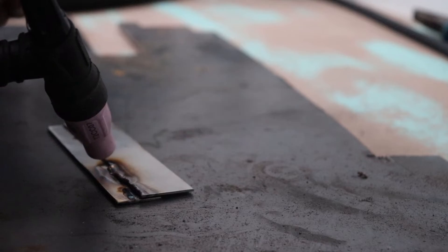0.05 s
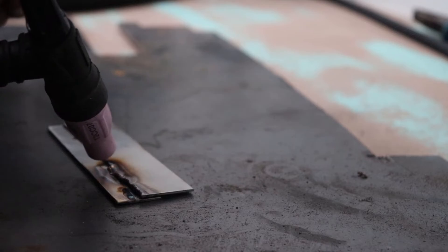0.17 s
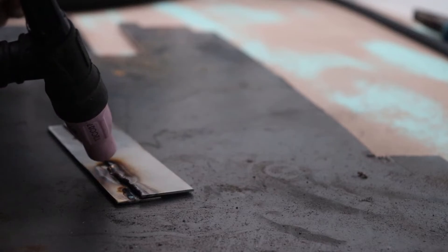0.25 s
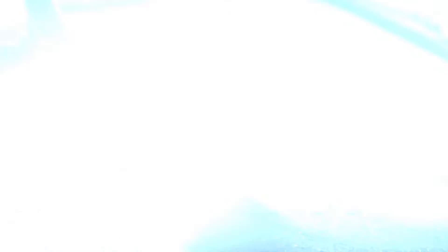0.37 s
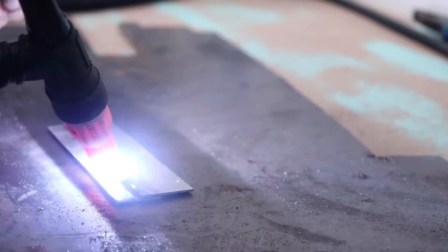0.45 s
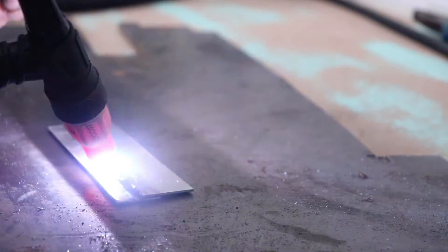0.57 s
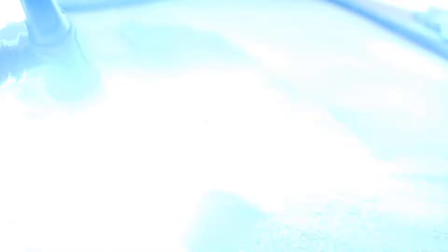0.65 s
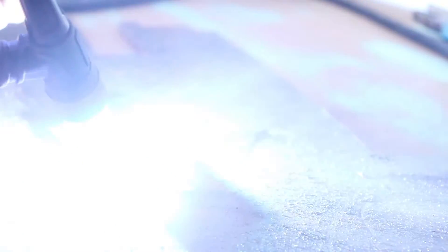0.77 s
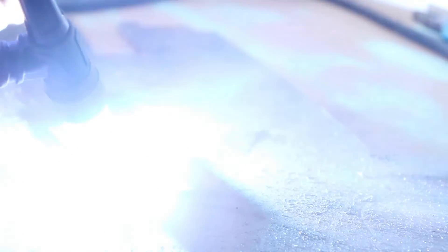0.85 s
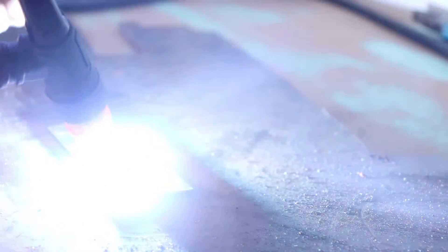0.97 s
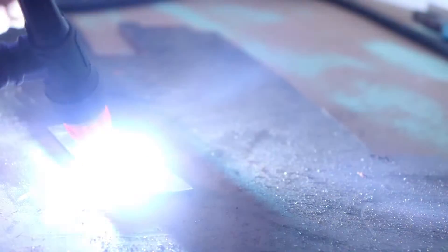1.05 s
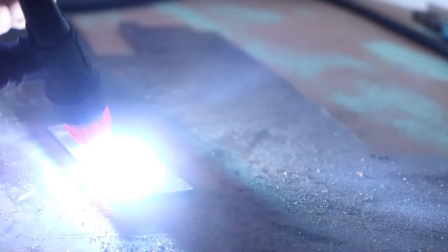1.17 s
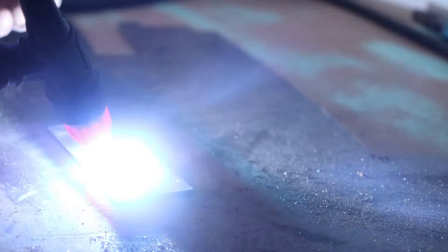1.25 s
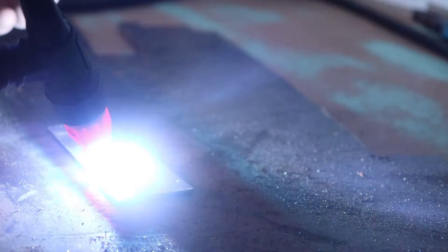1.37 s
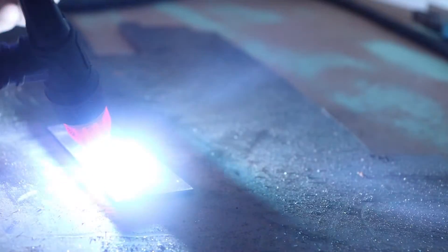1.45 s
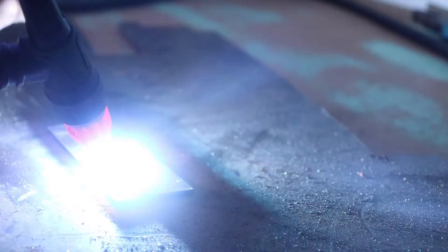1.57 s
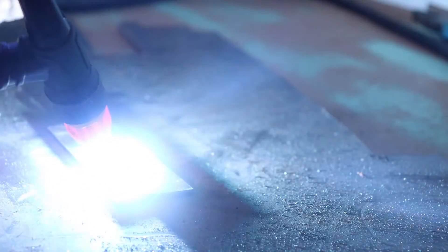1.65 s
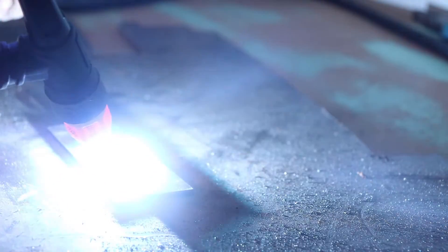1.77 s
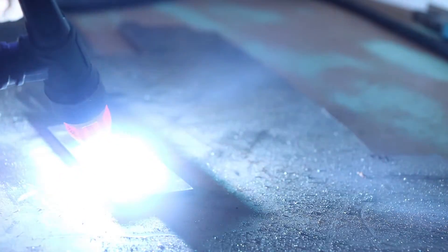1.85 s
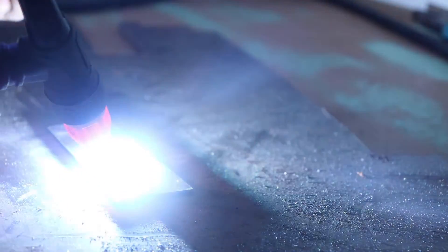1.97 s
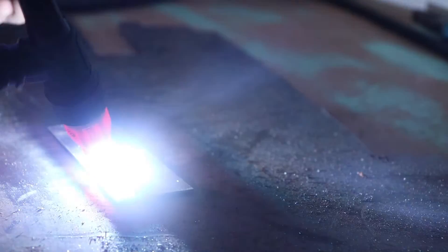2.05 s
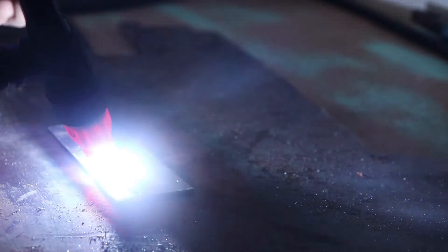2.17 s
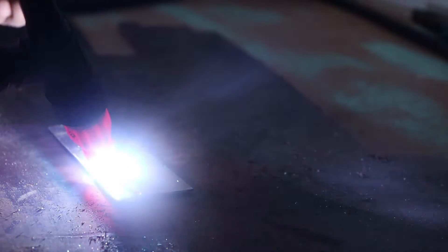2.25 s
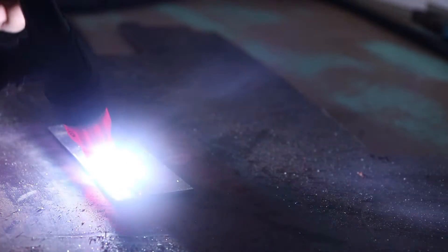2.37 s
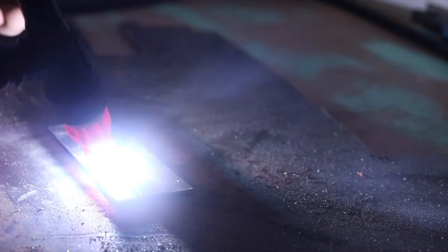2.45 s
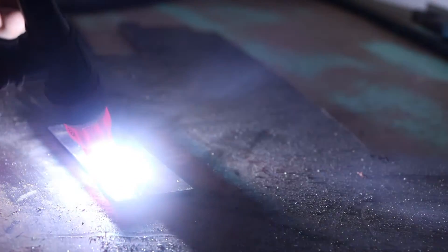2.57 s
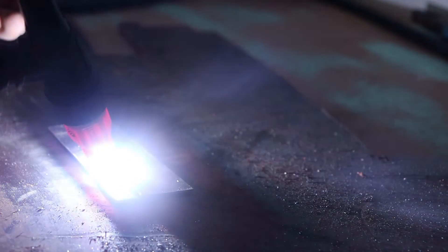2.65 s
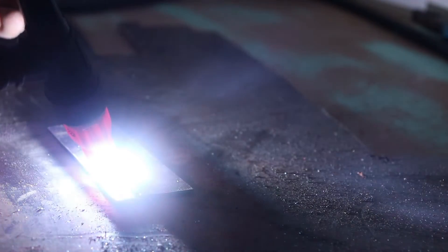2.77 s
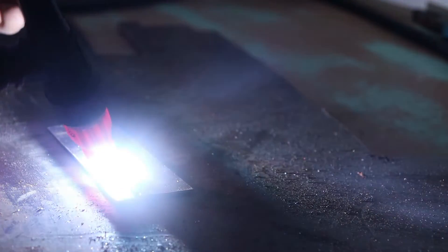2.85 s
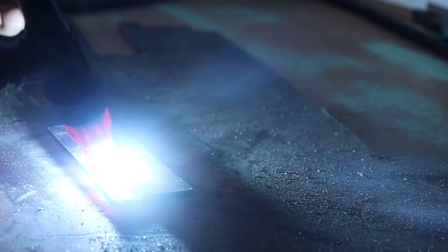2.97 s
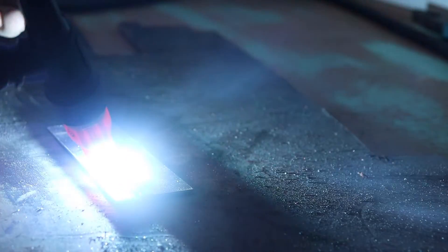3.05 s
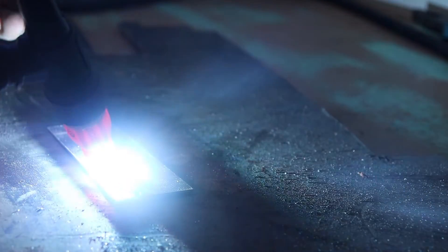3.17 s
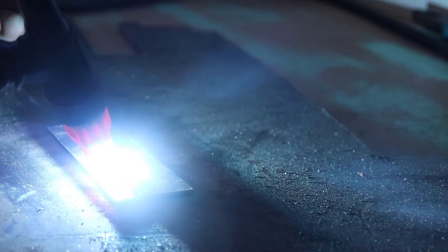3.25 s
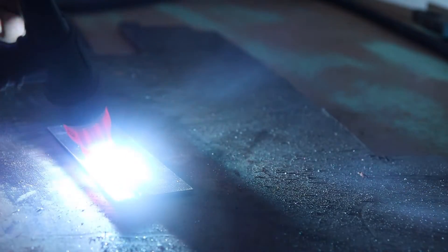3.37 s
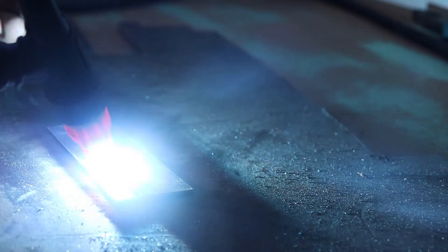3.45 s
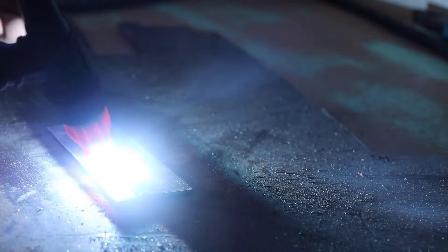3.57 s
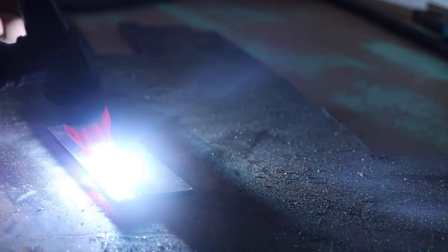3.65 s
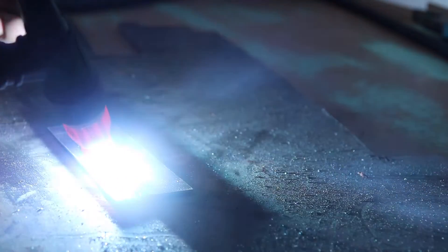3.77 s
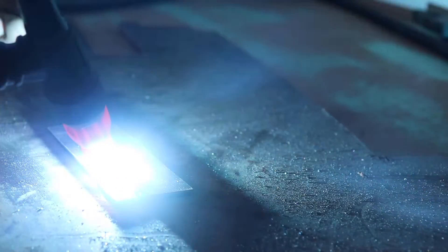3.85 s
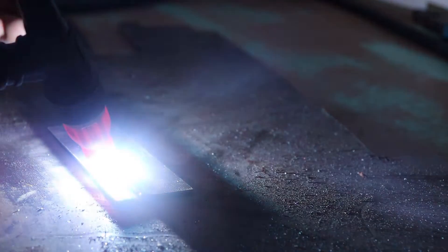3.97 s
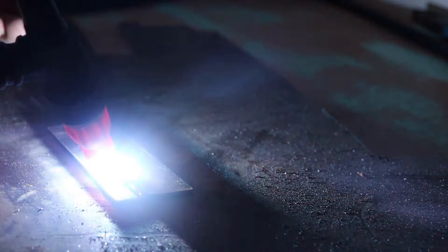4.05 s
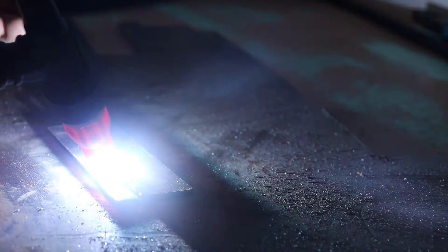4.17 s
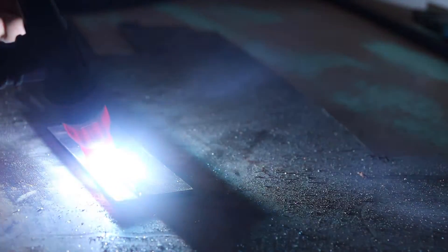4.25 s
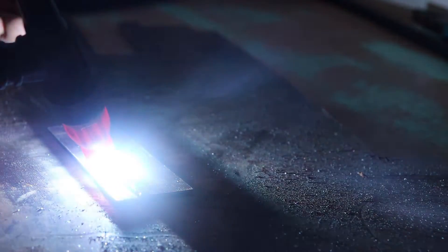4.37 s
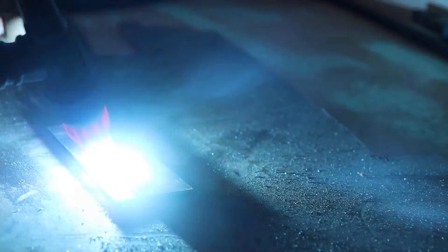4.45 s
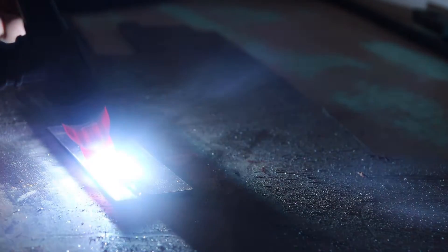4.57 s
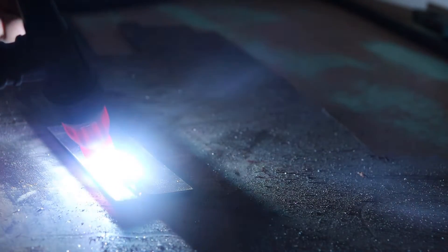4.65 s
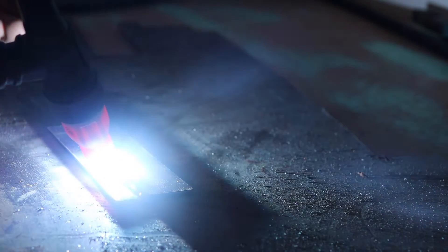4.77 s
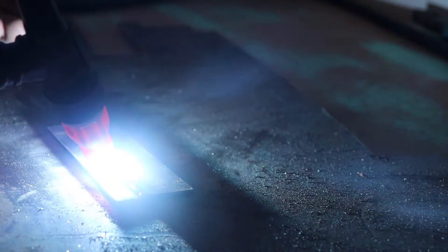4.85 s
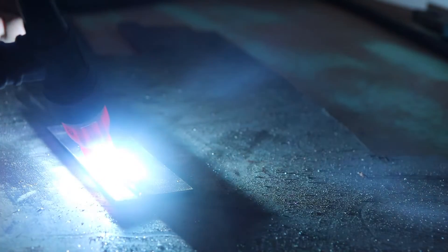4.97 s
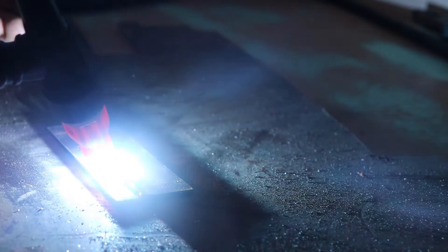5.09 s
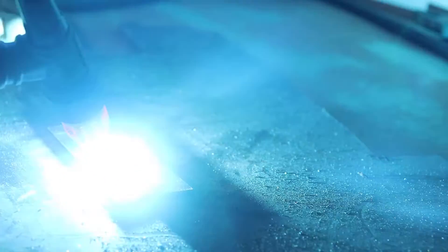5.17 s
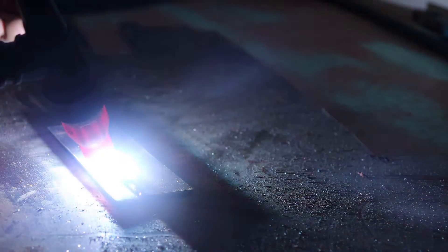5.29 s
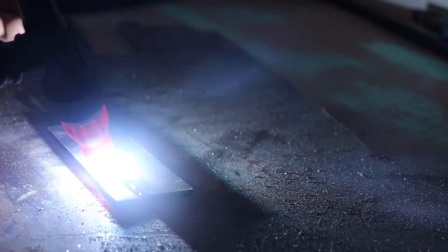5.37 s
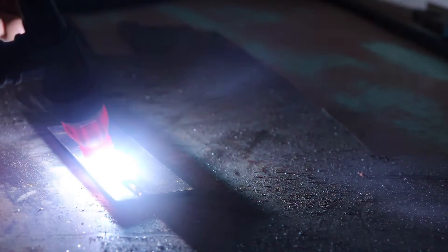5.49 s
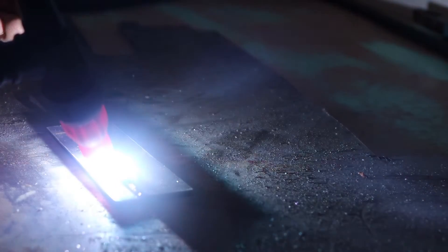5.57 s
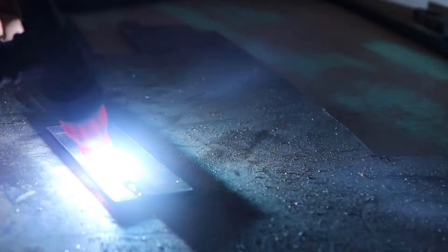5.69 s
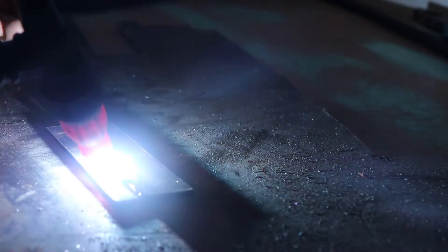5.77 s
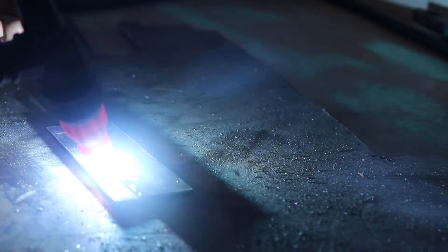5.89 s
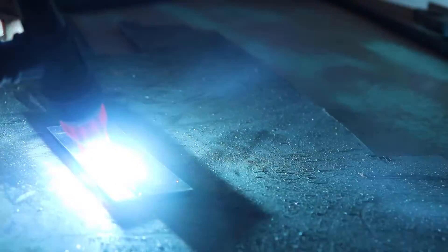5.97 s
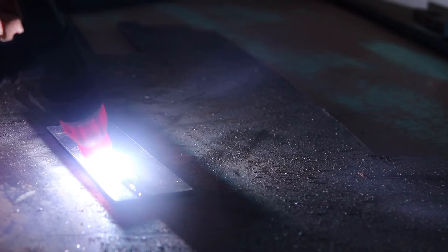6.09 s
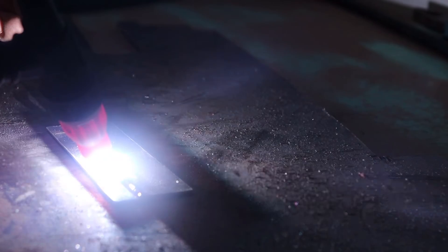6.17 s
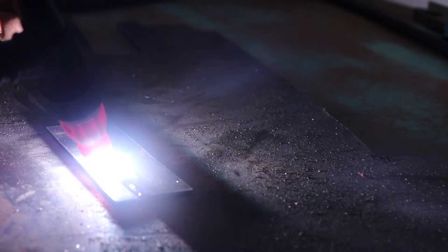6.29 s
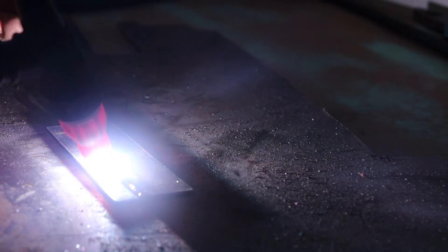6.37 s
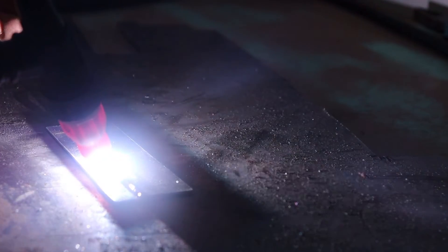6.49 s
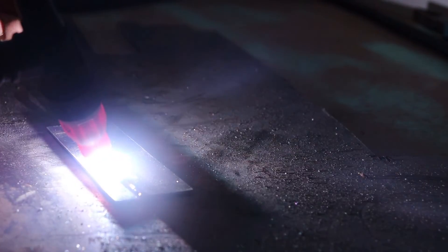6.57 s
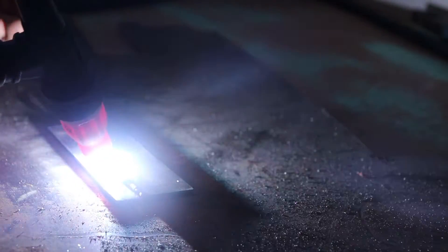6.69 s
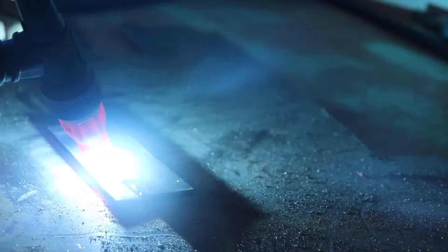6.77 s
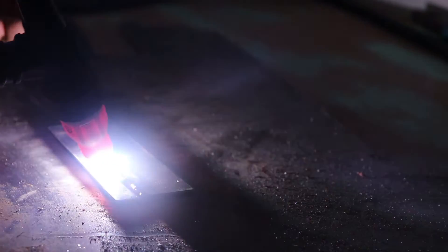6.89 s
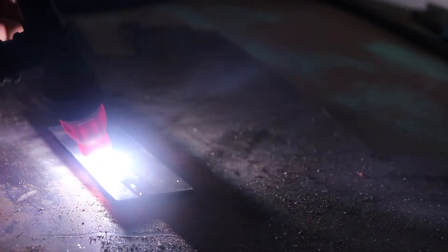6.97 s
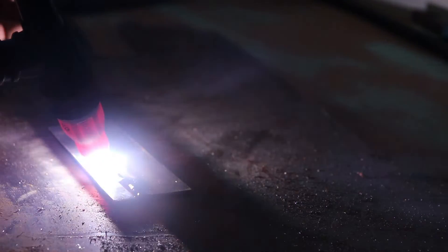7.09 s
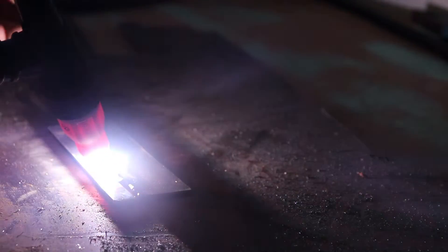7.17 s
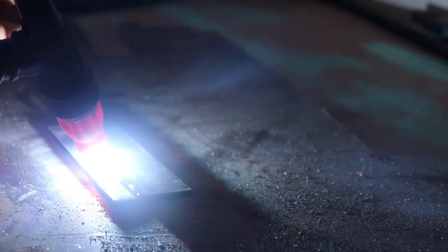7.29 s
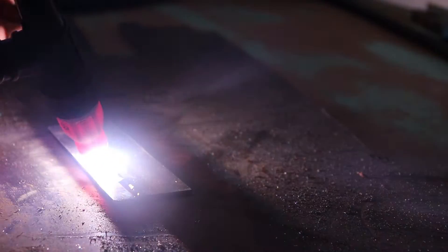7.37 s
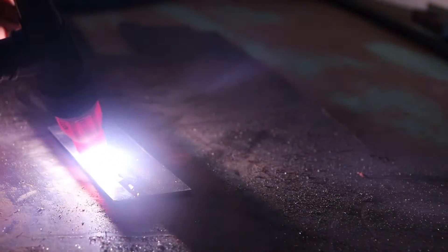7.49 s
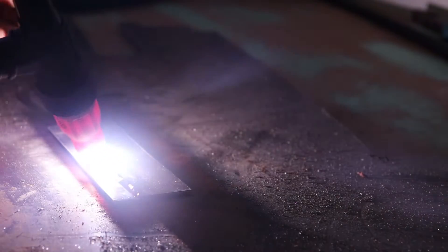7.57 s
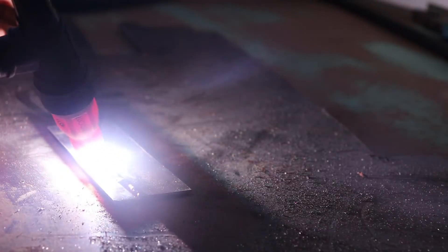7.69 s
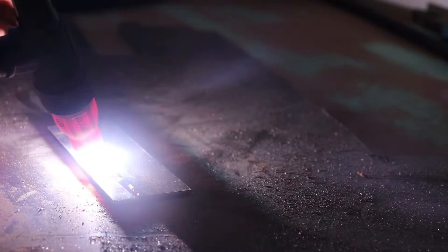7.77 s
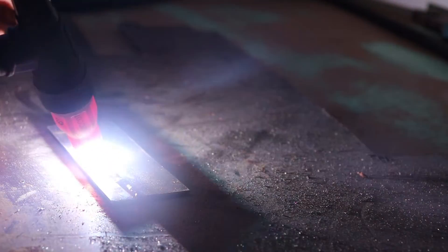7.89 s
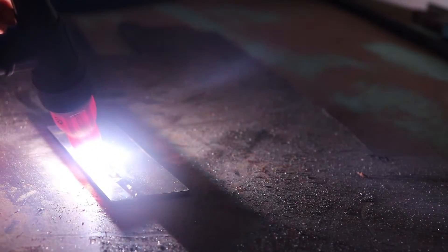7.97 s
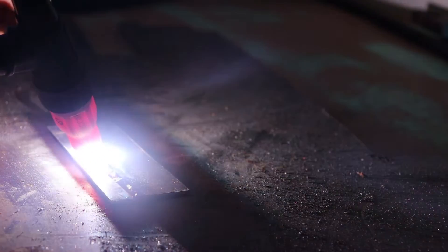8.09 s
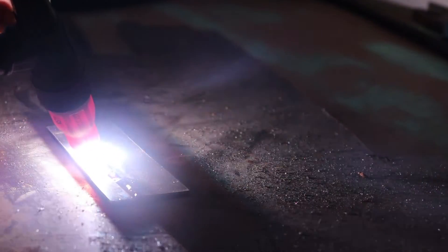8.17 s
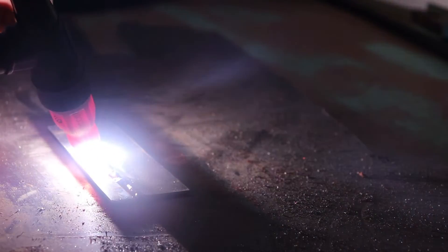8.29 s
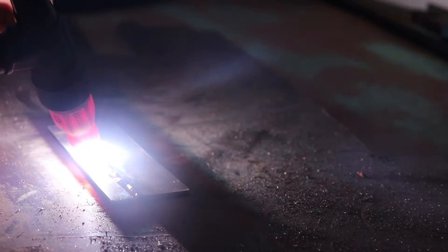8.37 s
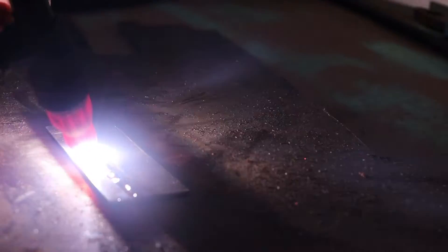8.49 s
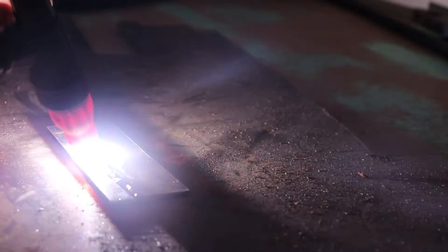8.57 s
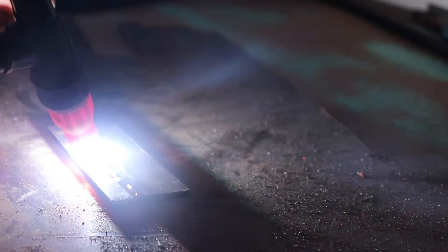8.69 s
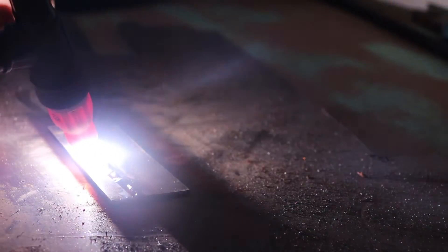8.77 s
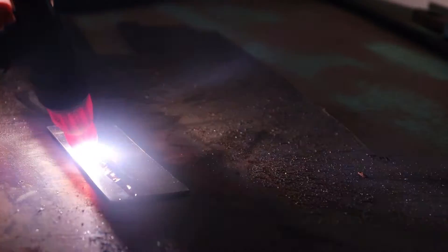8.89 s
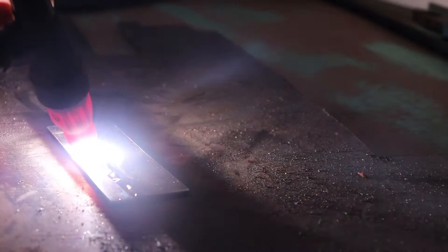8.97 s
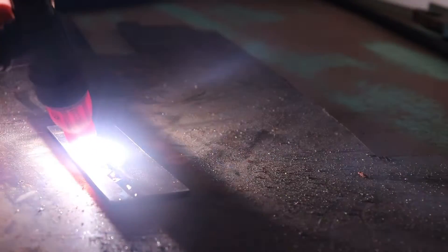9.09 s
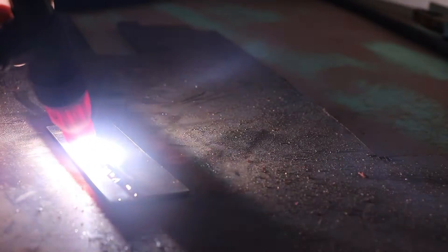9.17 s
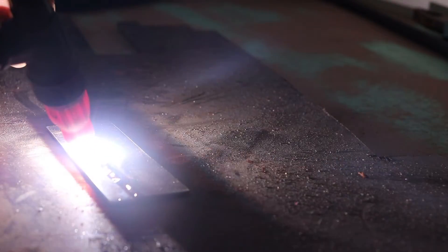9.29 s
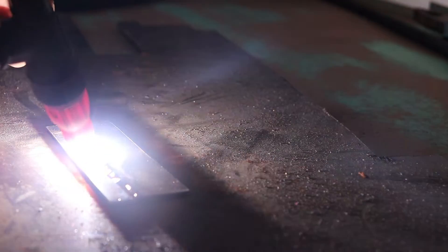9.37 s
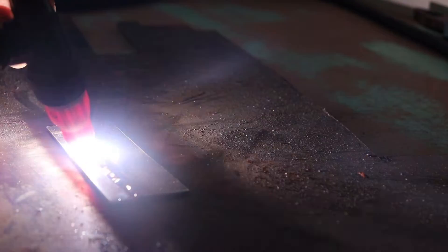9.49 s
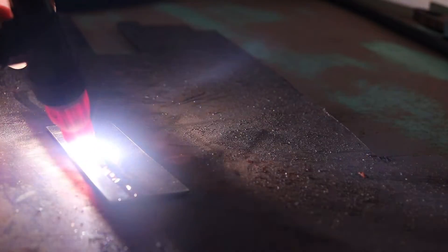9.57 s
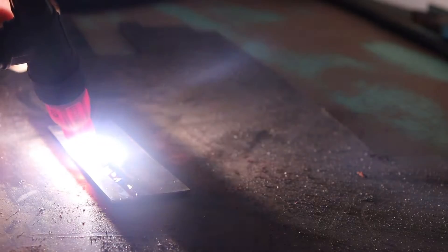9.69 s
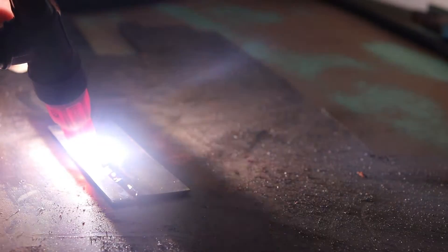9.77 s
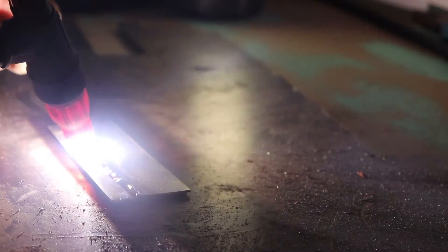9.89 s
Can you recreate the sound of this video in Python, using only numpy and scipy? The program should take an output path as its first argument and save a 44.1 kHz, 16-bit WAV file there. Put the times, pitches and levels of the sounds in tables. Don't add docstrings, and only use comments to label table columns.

```python
import sys
import numpy as np
from scipy import signal
from scipy.fft import rfft, irfft, next_fast_len
from scipy.io import wavfile
from scipy.ndimage import uniform_filter1d, map_coordinates

SR = 44100
rng = np.random.default_rng(int(sys.argv[2]) if len(sys.argv) > 2 else 0)


def boost(x):
    u = np.asarray(x, float) / 20
    return 10 ** u


def generate_wav(signal):
    frames = np.transpose(np.atleast_2d(signal))
    scaled = np.clip(frames, -1, 1) * 32767
    pcm = np.round(scaled).astype(np.int16)
    wavfile.write(sys.argv[1], SR, pcm)


N = 438354
SECONDS = np.arange(N) / SR
SIZE = next_fast_len(N + 8192)
HZ = np.fft.rfftfreq(SIZE, 1 / SR)
STRIKE_S, CUT_S = .4848, 6.724
TOP_HZ = 15850

COLD = [(170, -17), (1550, -9), (4570, -13), (7240, 0.5), (9130, -9.5), (10850, -4.5), (12320, -19),
        (15590, -23.0)], [(317, 82, -13), (1030, 74, 9), (1310, 54, -7), (1946, 62, 6.5), (2320, 60, -6),
        (2570, 81, 5), (4910, 130, -12), (5360, 98, 6.5), (6300, 81, -7), (8400, 130, 3.5), (8680, 90, -15),
        (11230, 120, 8.5), (12290, 190, -3.2), (13140, 150, 10), (13730, 110, -9.7), (14430, 90, -3)]
WIDE = [(170, -0.5), (1000, -7), (3000, -3.5), (5000, -5), (7000, -3), (11000, -7), (12500, -16),
        (15600, -22)], []
FAR_LATE = [(170, -8), (600, -7), (1550, -3.5), (4570, -1), (6800, -9), (8960, -11.5), (12660, -6),
            (14470, -5), (15200, -1), (15800, -18)], [(3300, 230, -2.5), (5360, 640, 2), (6200, 59, -17),
            (8960, 370, 8.5)]
# left over right [dB], lead of the right [rad],
# likeness [0-1].
NEAR_PORTS = [(170, 7.3), (1030, 20.0), (1890, 13.0), (3960, 6.0), (5250, 5.0), (7920, 9.0), (9820, -1.0),
              (10250, 0.0), (11710, -4.0), (12230, -1.0), (13010, -3.0), (15590, 4.0)], [(170, -1.3),
              (1550, 0.35), (6030, 0.62), (8790, 1.73), (9220, 2.44), (9990, 1.4), (10590, 2.25),
              (12830, 2.8), (13610, 2.9), (15590, 3.9)], [(170, 0.78), (3880, 0.3), (7320, 0.91),
              (9390, 0.6), (11280, 1), (12830, 0.1), (13950, 0.57), (15590, 0.4)]
FAR_PORTS = [(170, 0.67), (2150, 4.6), (2840, 5.8), (3450, 7.4), (4650, 12.5), (6120, 5.6), (8010, 5.0),
             (9040, 12), (9990, 6.2), (10940, 3.2), (14810, 13), (15590, 7.0)], [(170, 0.46), (950, -0.58),
             (4650, -0.57), (6030, -0.2), (6370, -0.03), (7060, 0.64), (8440, -0.35), (9730, 0.58),
             (14380, 0.91), (15590, 0.82)], [(170, 0.024), (950, 0.62), (2070, 0.34), (7240, 0.02),
             (8350, 0.3), (12140, 0.25), (13610, 0.48), (15590, 0.21)]
# time [s], place [0 wide, 1 early, 2 late].
TRAVEL = [(.78, 0), (.95, 1), (2.5, 1.2), (5.6, 2), (7.5, 2)]


def unit(x):
    return x / np.sqrt(np.mean(x ** 2) + 1e-20)


def line(points, at):
    return np.interp(at, *np.transpose(points))


def gate(t0, t1):
    return (SECONDS >= t0) & (SECONDS < t1)


def wobble(rate):
    return map_coordinates(rng.standard_normal(int(N * rate / SR) + 4), [SECONDS * rate])


def swell(s, rise, t60):
    t = np.clip(SECONDS - s, 0, None)
    return np.minimum(t / rise, 1) * boost(-60 * np.clip(t - rise, 0, None) / t60)


def causal(db):
    cep = irfft(db * np.log(10) / 20, SIZE)
    cep[1:SIZE // 2] *= 2
    cep[SIZE // 2 + 1:] = 0
    return np.exp(rfft(cep))


def way(colour, ports, stretch=1):
    slope, bumps = colour
    hz = HZ / stretch
    db = line(slope, hz) + sum(gain * np.exp(-.5 * ((hz - centre) / width) ** 2) for centre, width, gain in bumps)
    db = db - 10 * np.log10(1 + (110 / (HZ + 1)) ** 4)
    share = 1 / (1 + boost(-2 * line(ports[0], HZ)))
    lead = np.exp(1j * line(ports[1], HZ))
    pair = causal(db) * np.array([np.sqrt(share), np.sqrt(1 - share) * lead])
    band = (HZ > 600) & (HZ < 15000)
    return pair / np.sqrt(np.sum(abs(pair.mean(axis=0)[band]) ** 2) / len(HZ))


def heard(spectrum, response):
    return irfft(spectrum * response, SIZE)[..., :N]


def reflections(paths):
    return sum(boost(db) * np.exp(-2j * np.pi * HZ * lag) for lag, db in paths)


def jet(ports, grain_db):
    flicker_db = grain_db * wobble(500) + 0.33 * wobble(30) + 0.44 * wobble(7)
    shared = unit(rng.standard_normal(N) * boost(flicker_db))
    alike = np.clip(line(ports[2], HZ), 0, 1)
    other = rfft(rng.standard_normal(N), SIZE)
    direct = rfft(shared, SIZE)
    return np.array([direct, alike * direct + np.sqrt(1 - alike ** 2) * other])


def draught():
    # middle [s], peak [dB], half length [s].
    gusts = [(0.065, -40, 0.11), (0.408, -46.5, 0.13), (.64, -50, .04), (.82, -48, 0.22), (2.0, -47, 0.14),
             (2.235, -42.5, 0.098), (2.5, -42, 0.14), (2.68, -46, 0.11), (2.802, -42, .05), (3, -39, 0.065),
             (3.226, -38.5, .03), (3.32, -37, .04), (3.425, -40, 0.055), (3.546, -44, .04),
             (3.697, -47.5, .07), (5.603, -45.5, .05), (5.84, -48, 0.033), (6.166, -49, 0.064),
             (7.9, -61, .04), (8.96, -59, .03), (9.07, -55, .06)]
    band = (HZ / 55) ** 4 / (1 + (HZ / 55) ** 4) / (1 + (HZ / 110) ** 12)
    shared, left, right = heard(rfft(rng.standard_normal((3, N)), SIZE), band)
    pair = np.array([1.27 * (shared + 0.56 * left), 0.75 * (shared + 0.76 * right)])
    loudness = np.sqrt(abs(uniform_filter1d(pair.mean(axis=0) ** 2, size=SR // 20)) + 1e-9)
    blow = sum(boost(db) * np.exp(-((SECONDS - s) / half) ** 2) for s, db, half in gusts)
    air = rng.standard_normal((3, N))
    air_band = HZ ** 2 / (HZ ** 2 + 55 ** 2) / (1 + (HZ / 120) ** 4)
    still = unit(heard(rfft(air[0] + .6 * air[1:], SIZE), air_band))
    near_db, far_db, lumpy_db = -54, -64.5, 2.5
    calm = boost(np.where(SECONDS < CUT_S, near_db, far_db) + lumpy_db * wobble(9))
    return calm * still + pair / loudness * blow


def knock():
    # crack [dB], thud [dB], ring [dB].
    blow_levels = (-1.8, -4, -11)
    # frequency [Hz], level [dB], t60 [s].
    plate_modes = [(529, -5.5, .2), (718, -6, 0.071), (829, -2, 0.25), (1093, -8, .1), (1370, -12, 0.057),
                   (1700, -12, .03), (2000, -12, .025), (2380, -5, 0.027), (2960, -12, 0.02),
                   (4600, -3, .018)]
    crack_db, thud_db, ring_db = blow_levels
    s, thud_lag_s = 9.9235, .00045
    t = np.clip(SECONDS - s, 0, None)
    rough_phase = 0.73 * rng.standard_normal(N)
    crack = boost(crack_db) * swell(s, 0.00019, 0.0023) * np.sin(2 * np.pi * 11800 * t + rough_phase)
    thud_tones = [(1400, 0.97), (2900, 0.49), (4500, .35), (8200, 0.32)]  # Hz, gain
    thud = sum(g * np.sin(2 * np.pi * hz * (t - thud_lag_s)) for hz, g in thud_tones)
    thud = -boost(thud_db) * swell(s, 0.00076, 0.0034) * thud
    ring = sum(boost(db - 60 * t / t60) * np.sin(2 * np.pi * hz * t) for hz, db, t60 in plate_modes)
    ring = boost(ring_db) * np.clip(t / 0.0069, 0, 1) * ring
    return (crack + thud) * boost([[3], [-7]]) + ring * boost([[3.5], [-3.5]])


def crackle(count, t0, t1, db):
    u = rng.random((count, 4))
    return np.transpose([t0 + (t1 - t0) * u[:, 0], db + 9 * u[:, 1] ** 3, 5000 + 8000 * u[:, 2], 10 * u[:, 3]])


def ticks(rows, cycles):
    out, t = np.zeros((2, N + SR)), np.arange(64) / SR
    for (s, db, hz, pan_db), u in zip(rows, rng.standard_normal(len(rows))):
        tick = np.exp(-t * hz / cycles) * np.cos(2 * np.pi * hz * t) + 0.094 * np.exp(-t * 9000)
        level = np.sign(u) * boost(db + np.array([[pan_db / 2], [-pan_db / 2]]))
        out[:, round((s + .0012) * SR):][:, :len(t)] += level * tick
    return out[:, :N]


def far_sparks():
    # start [s], peak [dB], ring [Hz], left over right [dB].
    sharp_sparks = [(6.7313, -20, 9770, 3), (6.76, -17, 13400, 7.5), (6.842, -18, 7980, 5.5),
                    (7.3624, -20, 8610, 5.5), (7.6427, -20, 8910, 7.0), (7.7538, -20, 13900, 2),
                    (7.7849, -20, 8490, 5), (7.8411, -19, 8800, 4.5), (7.9091, -7, 8050, 8),
                    (8.128, -16, 14400, 5.5), (8.2585, -22, 13900, 5.0), (8.2722, -11, 13900, 8),
                    (8.3475, -14, 13400, 10), (8.5556, -10, 12500, 13), (8.6637, -24, 14100, 6.5),
                    (8.768, -20, 14200, 5), (9.1354, -22, 9340, 6.5), (9.3826, -10, 12000, 4.0),
                    (9.892, -15, 10900, 12),
                    (7.911, -10, 9800, 3)]
    blunt_sparks = [(8.4564, -5.5, 11000, 5), (8.5332, -9, 8560, 11), (8.9498, -12, 6000, 8),
                    (8.9575, -14, 5000, 8), (9.0096, -12, 11500, 6), (9.0665, -10, 14000, 7),
                    (9.0685, -11, 5000, 8), (9.2661, -22, 12000, 7), (9.6941, -18, 11100, 6.5),
                    (9.8008, -8.5, 9500, 6)]
    faint = crackle(count=250, t0=4.9, t1=9.9, db=-35.5)
    return ticks([*sharp_sparks, *faint], cycles=1.65) + ticks(blunt_sparks, cycles=0.73)


def far_hiss(noise):
    # time [s], level [dB].
    hiss_levels = [(6.74, -36), (7.14, -37), (7.64, -36), (7.81, -35), (8.36, -34.5), (8.8, -35),
                   (9.2, -35), (9.5, -34.5), (9.63, -37.5), (9.75, -35.5), (9.9, -35.5)]
    # time [s], place [0 early, 1 late].
    torch_travel = [(7.3, 0.098), (9.3, 0.78)]
    # [Hz, width Hz, dB].
    early_colour = [
        [(170, -12), (600, -8), (1720, -4), (4570, -4), (6890, -9.5), (8700, -7), (11540, -11), (13610, -5.5), (15000, -8), (15800, -7)],
        [(4170, 80, 5.5), (4660, 220, 4.5), (5530, 90, 3.5), (12700, 120, -9)],
    ]
    place = line(torch_travel, SECONDS)
    early, late = heard(noise, way(early_colour, FAR_PORTS)), heard(noise, way(FAR_LATE, FAR_PORTS))
    return boost(line(hiss_levels, SECONDS)) * ((1 - place) * early + place * late)


def sputters(noise):
    # start [s], fizz [dB], plate hum [dB], rise [s], t60 [s].
    spits = [
        (7.66, -39, -43, 0.13, 0.83),
        (8.24, -47, -44, .05, 0.46),
        (8.528, -23.5, -25, 0.003, .1),
        (8.552, -29, -29, .004, .28),
        (8.949, -23, -36, 0.0023, 0.14),
        (9.03, -75, -35, 0.012, 0.15),
        (9.066, -22.5, -33, .002, 0.1),
        (9.075, -28, -30, 0.016, .12),
    ]
    # [Hz, width Hz, dB].
    hum_colour = [
        [(200, -20), (400, -11), (700, -2.5), (1200, -7), (1700, -10), (2600, -35), (4000, -11.5)],
        [(630, 70, 3), (1370, 240, 9.5)],
    ]
    pocket_colour = [(150, -22), (330, -3), (600, -4), (1100, 0), (1700, -5), (2400, -20), (4000, -35)], []
    # start [s], level [dB], rise [s], t60 [s].
    gas_pocket = (9.02, -32, .06, .55)
    hum_lag_s, hum_longer = 0.0027, 1.46
    dull = 1 / (1 + (HZ / 17000) ** 2)
    fizz = heard(jet(FAR_PORTS, grain_db=2.5), way(FAR_LATE, FAR_PORTS) * dull)
    hum = unit(heard(jet(FAR_PORTS, grain_db=-1.0), way(hum_colour, FAR_PORTS)))
    out = np.zeros((2, N))
    for s, db, hum_db, rise, t60 in spits:
        out += boost(db) * swell(s, rise, t60) * fizz
        out += boost(hum_db) * swell(s, rise + hum_lag_s, hum_longer * t60) * hum
    s, db, rise, t60 = gas_pocket
    return out + boost(db) * swell(s, rise, t60) * unit(heard(noise, way(pocket_colour, FAR_PORTS)))


def pings():
    # start [s], level [dB], frequency [Hz], t60 [s].
    droplets = [
        (8.532, -19, 1400, 0.045),
        (8.533, -27, 720, 0.085),
        (8.552, -26.5, 1160, .09),
        (8.548, -32, 2500, .05),
        (8.4, -38.5, 1500, .2),
    ]
    out = np.zeros((2, N))
    for s, db, hz, t60 in droplets:
        out += boost([[db + 2.5], [db - 5]]) * swell(s, 0.0035, t60) * np.sin(2 * np.pi * hz * SECONDS)
    return out


def far_arc():
    noise = jet(FAR_PORTS, grain_db=1.0)
    return gate(CUT_S, N) * (far_hiss(noise) + far_sparks() + sputters(noise) + pings())


def cold_gas(noise):
    # time [s], level [dB].
    gas_levels = [(0.0, -34), (0.006, -37.5), (0.064, -23), (0.12, -21), (0.478, -24.5)]
    # [Hz, width Hz, dB].
    puff_colour = [(150, -22), (290, -5.5), (450, -13), (670, -4.5), (1000, -14), (2000, -20)], []
    gas = gate(0, STRIKE_S) * boost(line(gas_levels, SECONDS)) * heard(noise, way(COLD, NEAR_PORTS))
    puff = unit(heard(noise, way(puff_colour, NEAR_PORTS)))
    return gas + boost(-25.0) * swell(-0.025, 0.037, 0.35) * puff


def gas_column(noise):
    # time [s], level [dB].
    roar_levels = [(.55, -66), (.7, -56), (.76, -47), (.84, -45.5), (1.45, -54.5), (1.95, -46.5),
                   (2.3, -52.5), (2.8, -50.5), (4.18, -47.5), (4.61, -49), (5.37, -46), (5.85, -46),
                   (6.3, -44), (6.7, -45.5)]
    # [Hz, width Hz, dB].
    upper_colour = [(240, -26.5), (300, -1.5), (370, -5), (500, 3), (640, -5.5), (760, -17.5),
                    (1000, -32.5)], []
    lower_colour = [(100, -5.5), (140, 4), (220, 1), (300, -7.5), (400, -38.5)], []
    upper_db = line(roar_levels, SECONDS) + 3.5
    lower_db = upper_db - 0.73 - 0.42 * SECONDS
    upper = boost(upper_db) * unit(heard(noise, way(upper_colour, NEAR_PORTS)))
    lower = boost(lower_db) * unit(heard(noise, way(lower_colour, NEAR_PORTS)))
    return gate(STRIKE_S, CUT_S) * (upper + lower)


def snaps(rows, signs, boost_db):
    # lag [s], level [dB].
    bench_echoes = [(.00065, -3), (.0011, -14), (.0018, -11), (.0031, -17), (.005, -20)]
    # [Hz, width Hz, dB].
    spark_colour = [
        [(200, -16), (500, -7), (900, -4), (2800, -5), (5400, -3), (7000, -7.5), (8600, -7), (9400, -6.5), (13400, -20), (16400, -15)],
        [(4560, 140, -4.5), (6600, 240, 8.5), (7970, 250, 7)],
    ]
    train = np.zeros(N)
    for (s, db), sign in zip(rows, signs):
        train[round((s + .0012) * SR)] += sign * boost(db + boost_db)
    echoed = (.35 + .65 / (1 + (4800 / (HZ + 1)) ** 6)) / (1 + (HZ / 11000) ** 6)
    return heard(rfft(train, SIZE) * (1 + echoed * reflections(bench_echoes)), way(spark_colour, NEAR_PORTS))


def near_sparks():
    # start [s], peak [dB].
    loud_snaps = [(3.901, -9.5), (3.9205, -7), (4.1215, 1.5), (4.1637, 1), (4.793, -14.5), (4.8128, -12),
                  (5.538, -10.5), (5.5962, -7.5), (5.8529, 2.5)]
    pulse_signs = [-1, 1, -1, 1, -1, 1, 1, -1, 1]
    faint = crackle(count=120, t0=0.48, t1=6.7, db=-31.5)[:, :2]
    signs = [*pulse_signs, 1, *np.sign(rng.standard_normal(len(faint)))]
    return snaps([*loud_snaps, (.5056, -16), *faint], signs, boost_db=4.0)


def young_spit():
    # start [s], end [s], level [dB].
    spit_burst = (.727, .747, -24)
    start, end, db = spit_burst
    burst = uniform_filter1d(1. * gate(start, end), size=200)
    colour = 0.85 * way(COLD, NEAR_PORTS) + 0.54 * way(WIDE, NEAR_PORTS)
    return boost(db) * burst * heard(jet(NEAR_PORTS, grain_db=2.5), colour)


def climbing(x):
    # first and last centre [Hz], width [Hz], first and last gain [dB].
    cup_ridges = [(5110, 5720, 80, -9, -13), (5680, 6150, 180, 2.5, 2), (6400, 6800, 100, -12, -2),
                  (6750, 7050, 63, -8, -9), (7150, 7600, 99, 7.5, 1.5), (7700, 8460, 110, -10, 1.5),
                  (8520, 8780, 80, -8, -6)]
    # time [s], share [0-1].
    climb_share = [(1, 0.023), (2.3, 0.31), (4, 0.67), (6.7, 1)]
    hz, s, z = signal.stft(x, SR, nperseg=1024)
    p = line(climb_share, s)
    db = 0
    for c0, c1, width, g0, g1 in cup_ridges:
        centre = c0 + (c1 - c0) * p
        db = db + (g0 + (g1 - g0) * p) * np.exp(-.5 * ((hz[:, None] - centre) / width) ** 2)
    lit = np.clip(line(TRAVEL, s), 0, 1)
    return signal.istft(z * boost(db * lit), SR, nperseg=1024)[1][:, :N]


def arc_hiss(noise):
    # time [s], level [dB].
    flare_levels = [(.5, -38), (0.53, -40.5), (0.56, -39), (0.61, -34), (0.666, -27.5), (0.72, -27),
                    (0.74, -27), (0.756, -29.5), (0.93, -37), (1.09, -39)]
    arc_levels = [(1.1, -38.5), (2.36, -37), (5.5, -37.5), (6.7, -37)]
    # [Hz, width Hz, dB].
    early_colour = [
        [(170, -9), (2930, -12.5), (4390, -16.0), (7580, -6.5), (9040, -17), (10770, -14.5), (12750, -24), (15590, -29)],
        [(151, 63, 16), (858, 107, -5.5), (1000, 60, 9), (1295, 87, -9), (1924, 47, 9), (2845, 26, -16), (3146, 130, 6), (3880, 87, -14), (4900, 240, -4), (10170, 80, 5), (11150, 110, 8), (14540, 130, 1)],
    ]
    late_colour = [
        [(170, -1), (1210, -6.5), (4220, -17), (7750, -4.5), (9220, -17), (10770, -14), (12320, -19.5), (15590, -31.5)],
        [(444, 55, -6), (806, 84, -8), (1290, 90, -10.5), (2055, 92, 5), (2866, 30, -25), (3217, 143, 9), (4370, 33, 8), (4590, 120, -12.5), (11000, 60, 8), (11130, 51, 3.3), (12700, 110, -6), (13790, 80, -1)],
    ]
    place = line(TRAVEL, SECONDS)
    low = 1 / (1 + (HZ / 620) ** 8)
    hiss = np.zeros((2, N))
    for k, colour in enumerate([WIDE, early_colour, late_colour]):
        hiss += np.clip(1 - abs(place - k), 0, 1) * heard(noise, way(colour, NEAR_PORTS) * (1 - low))
    level = boost(line(list(flare_levels) + list(arc_levels), SECONDS))
    return gate(STRIKE_S, CUT_S) * level * climbing(hiss)


def near_arc():
    # lag [s], level [dB].
    wall_echoes = [(.0024, -22), (.0029, -21), (.0035, -21), (.0049, -18), (.0082, -25), (.0165, -25),
                   (.021, -23)]
    noise = (1 + reflections(wall_echoes)) * jet(NEAR_PORTS, grain_db=0.5)
    return cold_gas(noise) + arc_hiss(noise) + gas_column(noise) + near_sparks() + young_spit()


def strike():
    swing_times = [
        (.0007, .0041, .0153, .043, .098, .17),
        (.0017, .0061, .0178, .046, .102, .175),
    ]
    # swing number, level [dB].
    throw_sizes = [(0, 32), (1, 21), (2, 23), (2.8, 5), (3, 0), (3.15, -8), (3.4, -12), (3.8, -18),
                   (4.5, -31), (5.2, -42), (6, -46)]
    # start [s], end [s], level [dB].
    first_flash = (.4880, .4920, -8)
    t = np.clip(SECONDS - STRIKE_S, 1e-5, None)
    turns = np.array([np.interp(np.log(t), np.log([s[0] / 8, *s]), np.arange(len(s) + 1)) for s in swing_times])
    throw = boost(line(throw_sizes, turns) + [[0], [-3.5]]) * np.sin(np.pi * turns)
    start, end, flash_db = first_flash
    flash = boost(flash_db + np.array([[-3], [4]])) * gate(start, end)
    rattle_db, rattle_t60_s = -8, .02
    harsh = heard(jet(NEAR_PORTS, grain_db=7), (HZ < TOP_HZ) * way(WIDE, NEAR_PORTS))
    rattle = (boost(rattle_db - 60 * t / rattle_t60_s) + flash) * harsh
    return gate(STRIKE_S, CUT_S) * (rattle - throw)


def scene():
    sound = draught() + knock() + far_arc() + near_arc()
    return heard(rfft(sound, SIZE), 1 / (1 + (HZ / TOP_HZ) ** 300)) + strike()


def top_cut(x):
    return signal.sosfilt(signal.butter(12, 16050, fs=SR, output="sos"), x)


def record(dry):
    clipped = dry / (1 + abs(dry / .99) ** 12) ** (1 / 12)
    return top_cut(clipped)


dry = scene()
out = record(dry)
generate_wav(out)
```